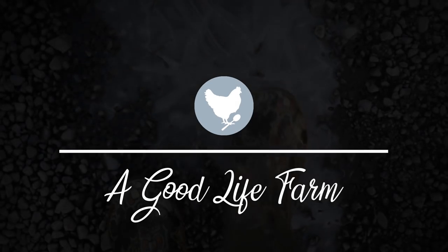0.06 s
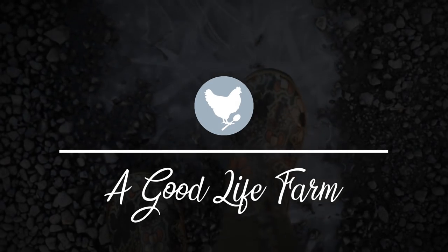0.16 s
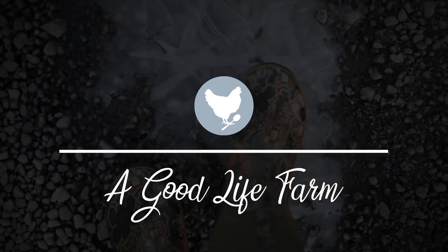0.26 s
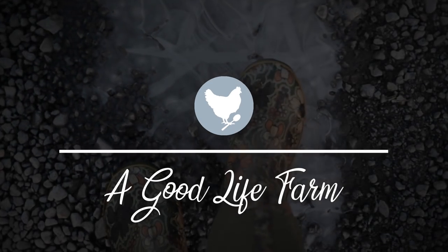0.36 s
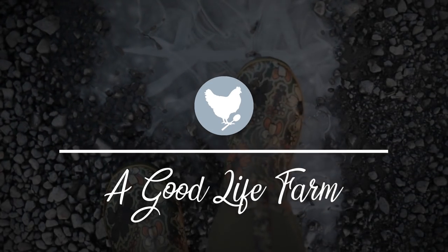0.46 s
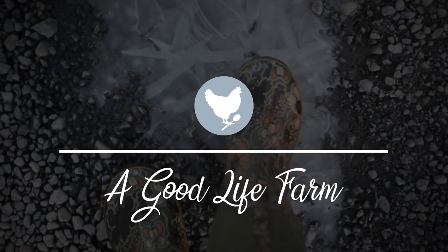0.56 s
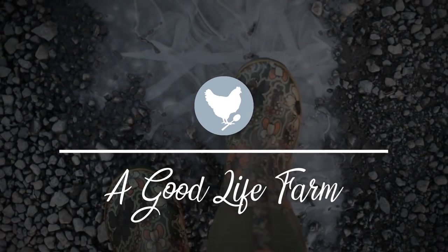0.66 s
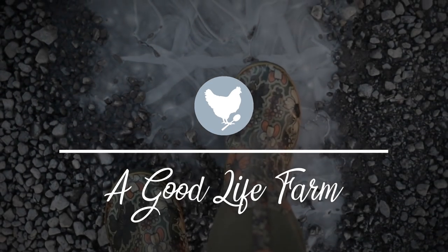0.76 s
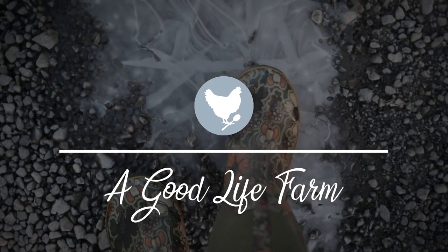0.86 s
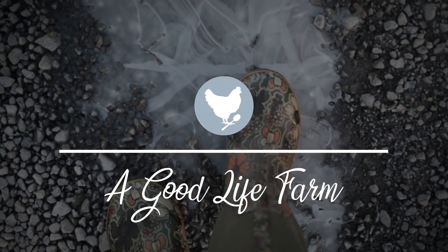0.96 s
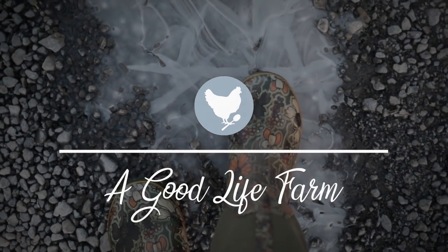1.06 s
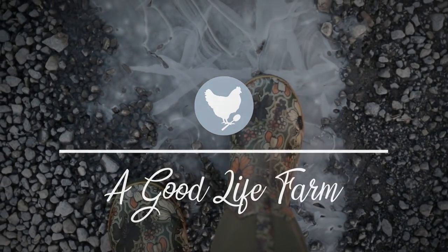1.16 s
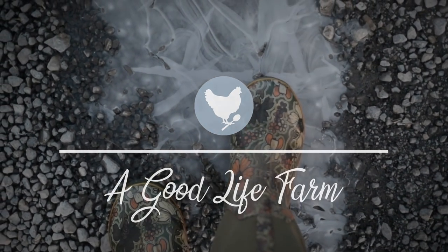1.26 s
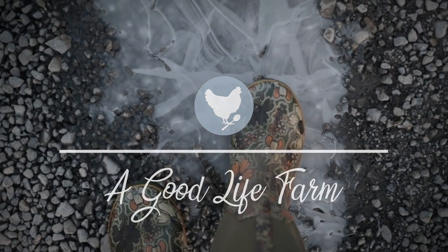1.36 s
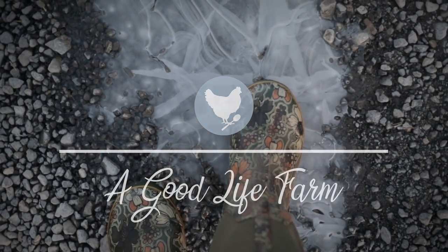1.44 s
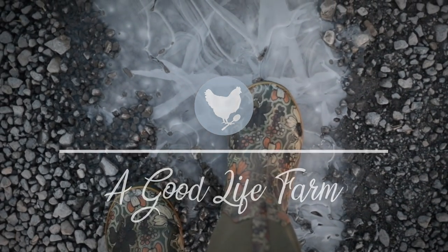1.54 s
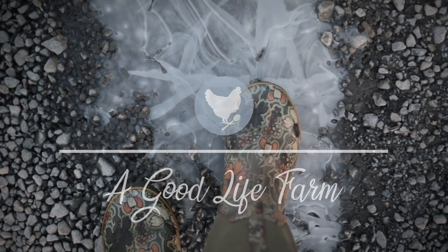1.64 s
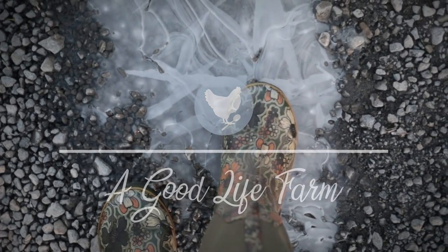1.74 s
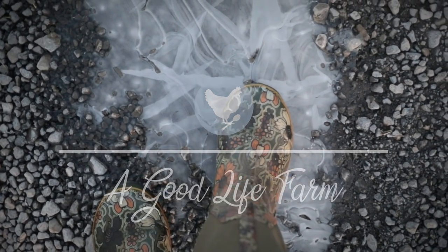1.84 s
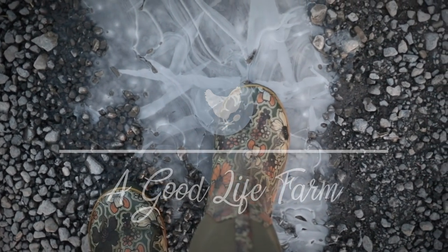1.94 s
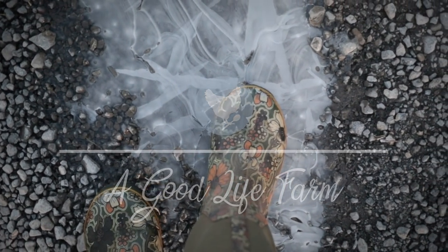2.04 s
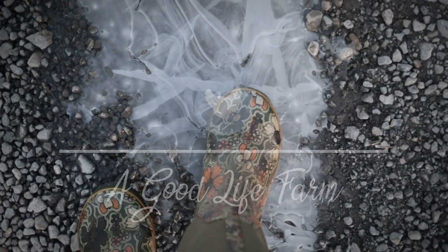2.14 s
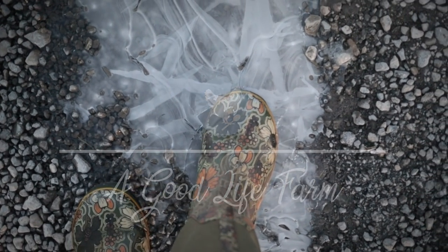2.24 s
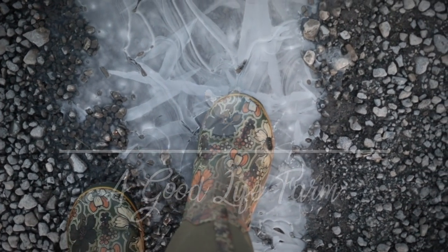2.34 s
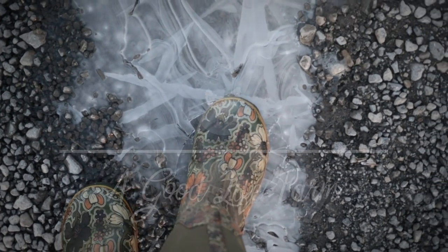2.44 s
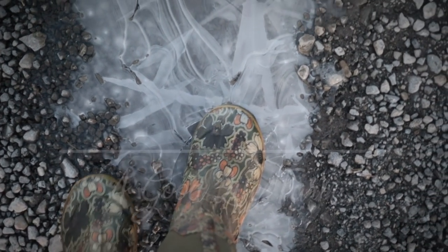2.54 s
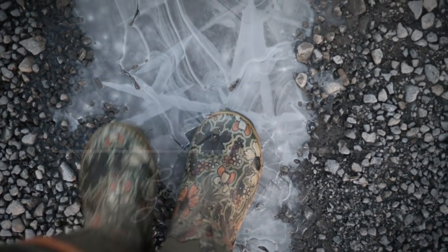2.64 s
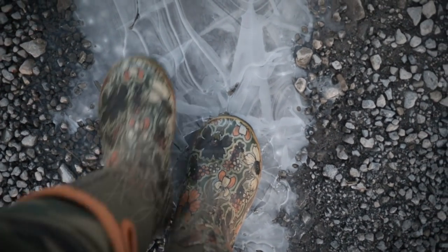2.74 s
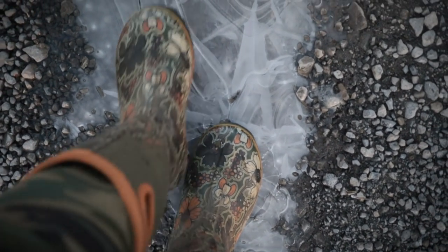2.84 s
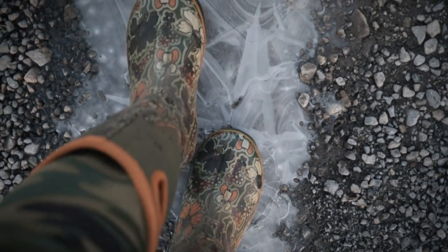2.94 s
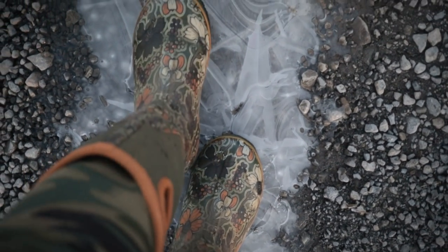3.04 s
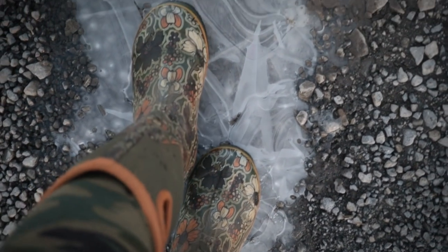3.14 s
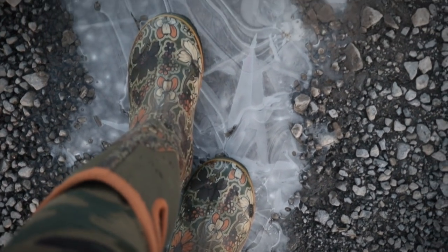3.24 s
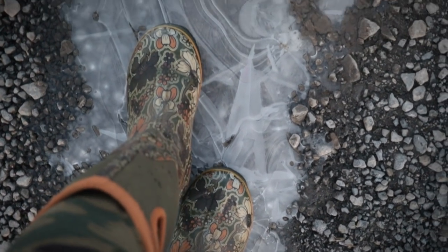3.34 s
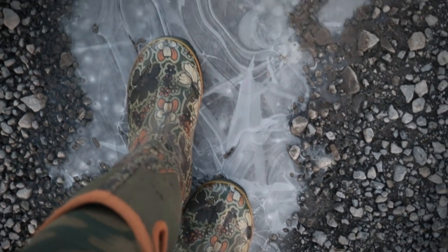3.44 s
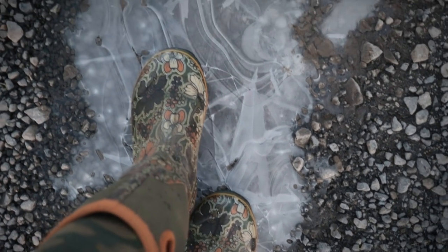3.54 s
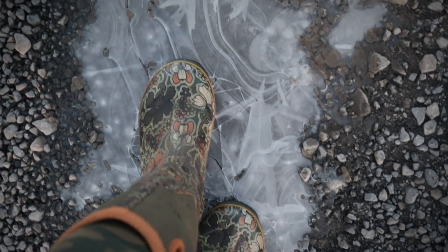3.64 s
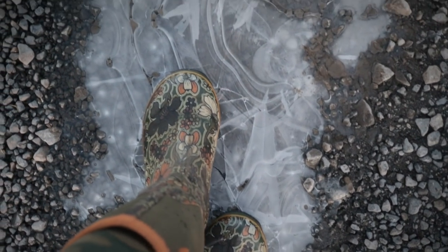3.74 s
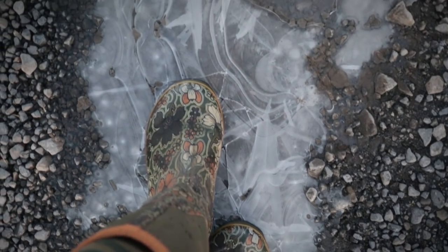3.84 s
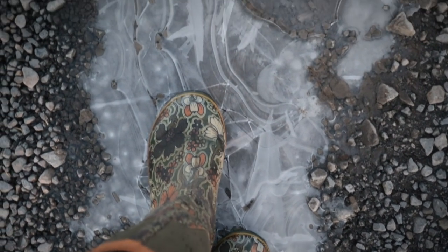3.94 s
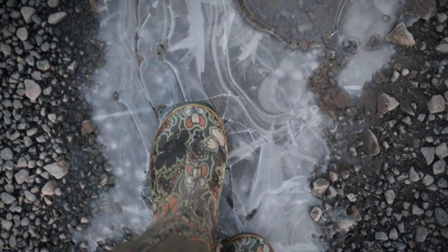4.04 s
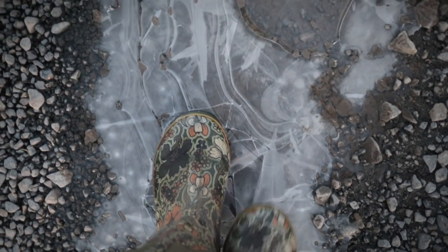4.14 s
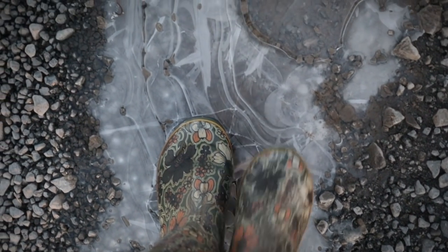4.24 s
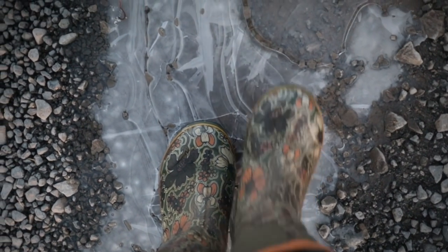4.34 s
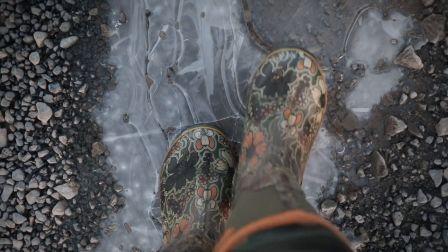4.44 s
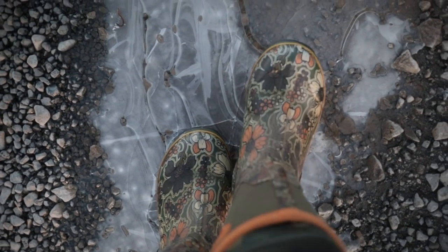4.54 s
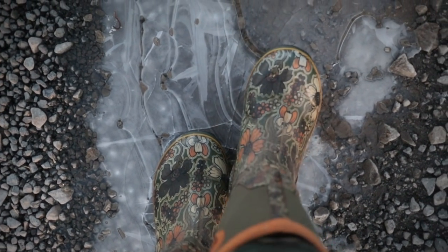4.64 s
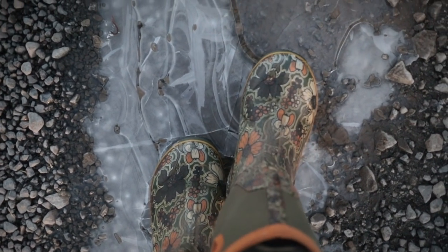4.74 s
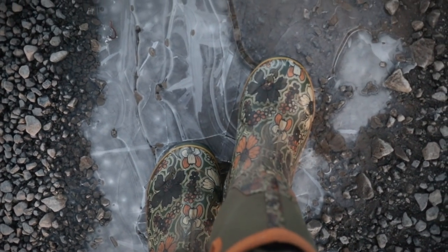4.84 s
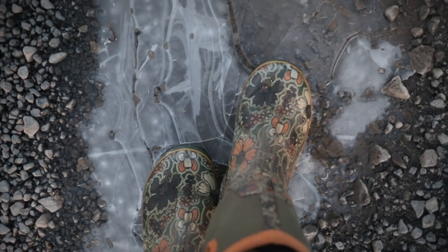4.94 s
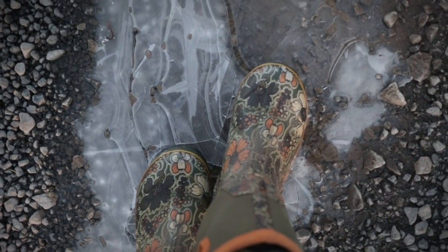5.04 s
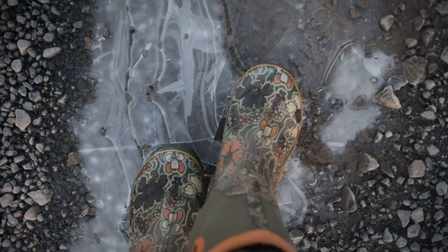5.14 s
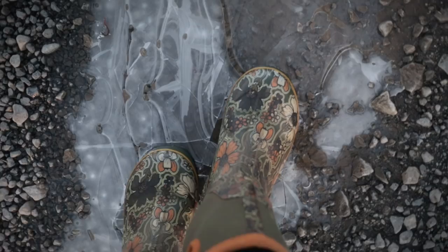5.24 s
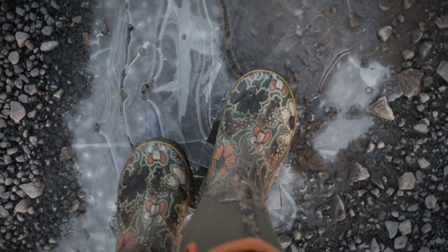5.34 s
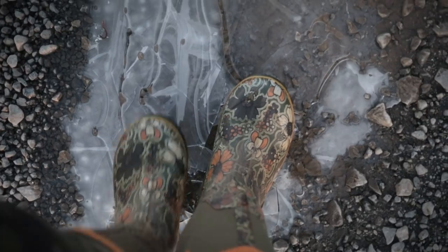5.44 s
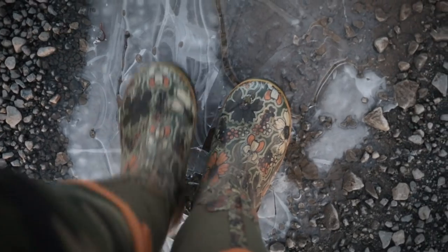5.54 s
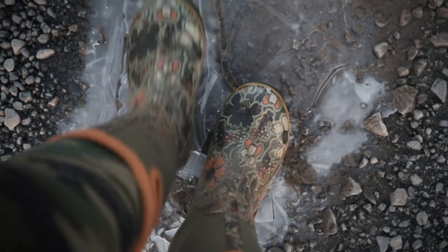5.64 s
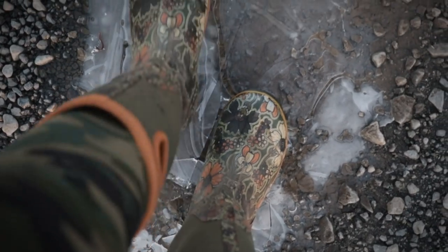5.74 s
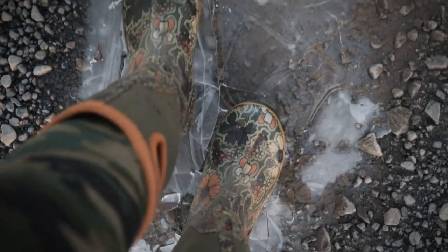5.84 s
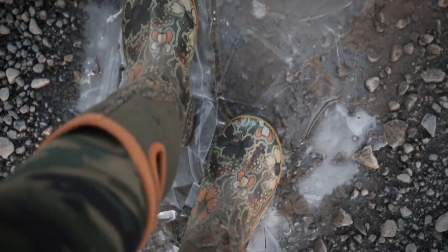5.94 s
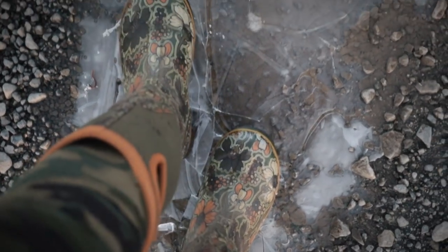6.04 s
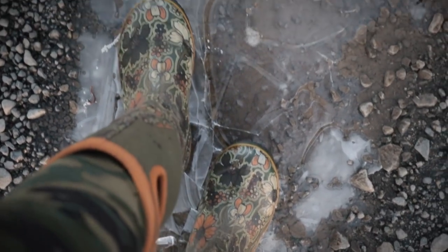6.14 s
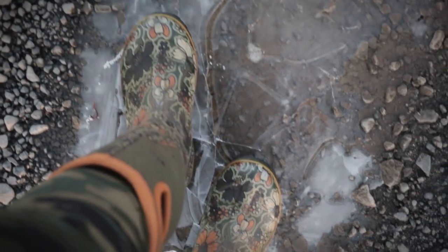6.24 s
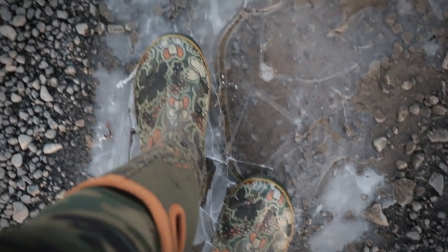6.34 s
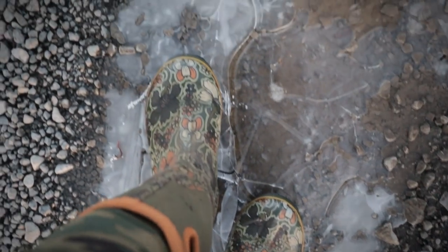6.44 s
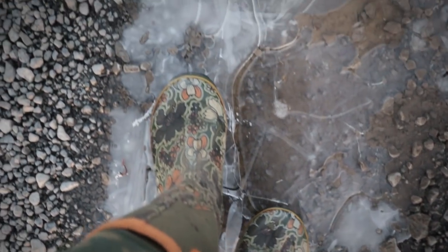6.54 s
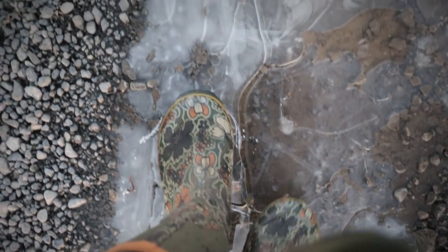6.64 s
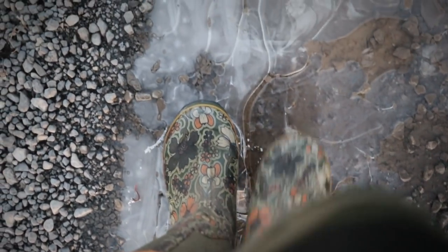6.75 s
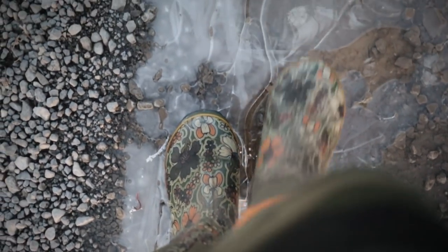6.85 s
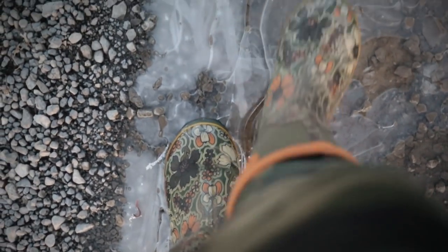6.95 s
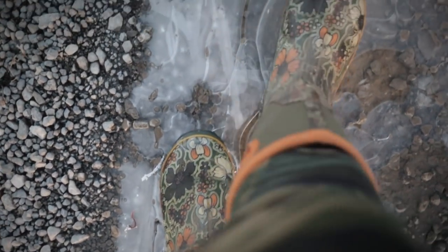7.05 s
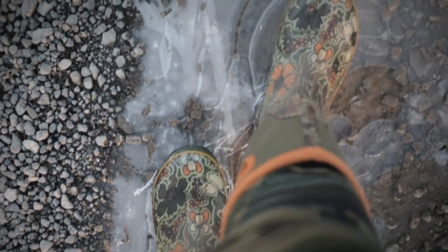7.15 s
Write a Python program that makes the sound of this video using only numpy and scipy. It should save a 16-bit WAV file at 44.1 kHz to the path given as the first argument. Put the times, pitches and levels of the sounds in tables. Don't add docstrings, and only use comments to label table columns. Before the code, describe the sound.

Very close outdoor sound of boots pressing a brittle ice skin over stones: irregular bursts of crackle, bright splinters, mid-pitched grinding plates and brief hollow thumps. The first step sounds higher and shallower, later ones fuller, the third densest and loudest. Between steps only sparse ticks and soft air remain. A distant bird chirps faintly near the start, wet rubber squeaks before the last steps, and peaks overload the small microphone.

```python
import sys
import numpy as np
from scipy import signal
from scipy.fft import rfft, irfft, next_fast_len
from scipy.io import wavfile
from scipy.ndimage import uniform_filter1d

SR = 44100
rng = np.random.default_rng(int(sys.argv[2]) if len(sys.argv) > 2 else 0)


def unload_audio(sound):
    columns = np.transpose(np.atleast_2d(sound))
    steps = np.round(np.clip(columns, -1, 1) * 32767)
    wavfile.write(sys.argv[1], SR, steps.astype(np.int16))


def how_loud(loudness_db):
    steps = np.asarray(loudness_db, float) / 20
    return 10 ** steps


N = 317079
LENGTH = 1536
EDGE_S = 1.5


def unit(x):
    return x / np.sqrt(np.mean(x ** 2) + 1e-20)


def equal_energy(rows):
    return 14 * rows / np.linalg.norm(rows, axis=1, keepdims=True)


def curves(rows):
    s, *columns = np.transpose(rows)
    return [np.interp(np.arange(N) / SR, s, column) for column in columns]


def coloured(x, points):
    f, level = np.transpose(points)
    hz = np.fft.rfftfreq(x.shape[-1], 1 / SR)
    gain = how_loud(np.interp(np.log(hz + 1), np.log(f + 1), level))
    return irfft(rfft(x) * gain, x.shape[-1])


def highpass(x, hz):
    return signal.sosfilt(signal.butter(2, hz, "high", fs=SR, output="sos"), x)


def scatter(rows, s):
    at = np.round(s * SR).astype(int)[:, None] + np.arange(rows.shape[1])
    return np.bincount(at.ravel(), rows.ravel(), N + LENGTH)[:N]


# (frequency [Hz], level [dB per Hz])
AIR = [(25, 19.5), (167, 1.5), (431, -15.5), (1280, -8), (10000, -64), (15000, -36), (16300, -24)]


def open_air():
    return how_loud(-44.5) * unit(coloured(rng.standard_normal(N), AIR))


# (time [s], level [dB])
DRONE_LEVEL = [
    (0, -35),
    (1.6, -42),
    (7.19, -55.5),
]
# (frequency [Hz], level [dB per Hz])
DRONE_COLOUR = [(20, 4.5), (160, -5), (260, -19.5), (1000, -49)]


def distant_drone():
    level_db, = curves(DRONE_LEVEL)
    return how_loud(level_db) * unit(coloured(rng.standard_normal(N), DRONE_COLOUR))


def whistle(rows):
    hz, db = curves(rows)
    t = np.arange(N) / SR
    flicker_db = 2.2 * unit(uniform_filter1d(rng.standard_normal(N), size=400))
    sounding = (t > rows[0][0]) * (t < rows[-1][0])
    return how_loud(db + flicker_db) * np.sin(2 * np.pi * np.cumsum(hz) / SR) * sounding


# (time [s], pitch [Hz], level [dB])
BIRD = [
    (.148, 3080, -73.5),
    (.165, 3120, -57),
    (.25, 3330, -65),
    (.3, 3420, -61),
]


def far_bird():
    return whistle(BIRD)


# (time [s], pitch [Hz], level [dB])
SQUEAK = [
    (5.45, 880, -63),
    (5.5, 868, -56),
    (5.61, 865, -45),
    (5.68, 850, -59),
]


def boot_squeak():
    return whistle(SQUEAK)


# (time [s], peak level [dB], pitch [Hz])
BUMPS = [
    (.257, -32.5, 550),
    (0.259, -29, 106),
    (.925, -30, 83),
    (5.756, -31.5, 100),
    (5.914, -27, 80),
    (6.336, -31.5, 130),
    (5.758, -6.5, 814),
    (7.1123, -26.5, 330),
]


def bumps():
    s, db, hz = np.transpose(BUMPS)[:, :, None]
    cycles = hz * np.arange(LENGTH) / SR
    return scatter(-how_loud(db + 24.5) * np.sin(2 * np.pi * cycles) * cycles * np.exp(-2.5 * cycles), s[:, 0])


def scrape(depth_db):
    z = signal.stft(rng.standard_normal(N), nperseg=512)[2]
    field = uniform_filter1d(rng.standard_normal(z.shape), size=6, axis=0)
    field = uniform_filter1d(field, size=16, axis=1)
    return unit(signal.istft(z * how_loud(depth_db * unit(field)), nperseg=512)[1][:N])


# (time [s], length [s], level [dB], band spacing [Hz])
SLIPS = [
    (1.076, 0.44, -43, 2600),
    (2.52, 0.1, -43.5, 3300),
]
# (frequency [Hz], level [dB])
SLICK = [(500, 2), (1400, -12), (6000, -3), (16000, -10)]


def slides():
    hiss = unit(coloured(scrape(depth_db=3), SLICK))
    t = np.arange(N) / SR
    out = np.zeros(N)
    for s, length, db, spacing_hz in SLIPS:
        swell = np.sqrt(np.abs(np.sin(np.pi * np.clip((t - s) / length, 0, 1))))
        echo = np.roll(hiss, round(SR / spacing_hz))
        out += how_loud(db) * swell * (hiss - 0.69 * echo)
    return out


# (time [s], length [s], level [dB], plate pitch [Hz])
GRINDS = [(0.756, 0.041, -25, 1100), (0.815, 0.15, -44, 1730), (0.959, 0.07, -26.5, 2050),
          (1.088, 0.039, -34, 1600), (2.552, 0.046, -31, 1230), (2.752, 0.029, -28, 1140),
          (3.43, 0.052, -24, 890), (3.551, .1, -23.5, 697), (3.773, .04, -22.5, 900),
          (4.012, 0.073, -33, 990), (4.425, .17, -44, 554), (5.078, .06, -43, 420),
          (5.242, .055, -37.5, 1190), (4.66, 0.029, -26.5, 1090), (4.844, .07, -24.5, 1120),
          (4.952, .025, -22.5, 1226), (4.981, 0.087, -27, 1140), (5.882, 0.053, -21, 1340),
          (6.14, 0.17, -34.5, 1150), (6.616, .11, -37.5, 900)]


def grinds():
    s, length, db, hz = np.transpose(GRINDS)[:, :, None]
    size = 4 * LENGTH
    t, f = np.arange(size) / SR, np.fft.rfftfreq(size, 1 / SR)
    uneven = uniform_filter1d(rng.standard_normal((len(s), size)), size=60, axis=1)
    slips = rng.standard_normal(uneven.shape) * how_loud(5.5 * unit(uneven))

    def mode(centre, sharpness=2.7):
        damping = 1j * f * centre / sharpness
        return damping / (centre * centre - f * f + damping)

    plate = mode(hz) - how_loud(-10) * mode(3.42 * hz)
    hum = irfft(rfft(slips) * plate, size)
    swell = np.sin(np.pi * np.clip(t / length, 0, 1) ** 0.87) ** 0.83
    return scatter(how_loud(db) * swell * hum / hum.std(axis=1, keepdims=True), s[:, 0])


def grains(count, low_hz, high_hz, cycles, spread_db):
    moment, pitch, size, phase = rng.random((4, count, 1))
    clump_s = np.sort(rng.random(count // 6)) * N / SR
    start_s = clump_s[(moment[:, 0] * (count // 6)).astype(int)] + .006 * rng.random(count)
    hz, t = low_hz * (high_hz / low_hz) ** pitch, np.arange(300) / SR
    rings = np.sqrt(hz) * np.sin(2 * np.pi * (hz * t + phase)) * np.exp(-t * hz / cycles)
    gain = how_loud(np.minimum(-spread_db * np.log(size), 8))
    return unit(scatter(rings * gain, np.minimum(start_s, N / SR)))


# (frequency [Hz], level [dB])
HOLLOW = [(60, -47), (140, -30), (270, 8), (450, 6.5), (800, -1), (1300, -14), (2500, -68)]


def pocket(x, s):
    shallow = [(1.69 * hz, db) for hz, db in HOLLOW[:3]] + HOLLOW[4:]
    return np.where(s < EDGE_S, unit(coloured(x, shallow)), unit(coloured(x, HOLLOW)))


# (frequency [Hz], level [dB])
SPLINTER = [(3000, -10.5), (6000, 1), (11000, -4), (16000, -7.5)]


def splinters(x):
    return coloured(x, SPLINTER)


# (time [s], sheet level [dB], hollow level [dB], shard pitch [Hz])
BREAKS_1 = [(0.3393, -11.5, -47, 4140), (0.3744, -9, -31, 980), (.491, -6.5, -14.5, 3970),
            (0.516, -14, -32, 920), (.553, -16.5, -37, 1190), (0.5899, -11, -12, 2500),
            (0.6416, -18.5, -19.5, 1910), (0.6935, -13.5, -39, 1120), (0.7176, -17, -11, 1050),
            (0.7468, -10.5, -30, 1000), (0.7562, -14, -26, 1000), (0.846, -12, -41, 1250),
            (0.8579, -8.5, -45, 2420), (0.872, -10.5, -55, 2570), (0.8926, -11.5, -31, 990),
            (0.901, -14.5, -41, 1800), (0.913, -14.5, -45, 1620), (0.929, -11.5, -13, 2280),
            (0.998, -21.5, -24, 2120), (1.0242, -18.5, -25, 2190), (1.04, -16.5, -40, 2460),
            (1.063, -12, -54, 1600), (1.086, -20.5, -47, 1540), (1.2991, -17.5, -22.5, 2050)]
BREAKS_2 = [(1.584, -8, -13, 3080), (1.6154, -20.5, -29, 980), (1.6312, -11, -14, 3300),
            (1.6412, -9.5, -12, 3280), (1.698, -17.5, -8.5, 3360), (1.8417, -15.5, -13.5, 2800),
            (1.9562, -9.5, -13.5, 2090), (1.9898, -12.5, -9.5, 1470), (1.9947, -10, -4, 3940),
            (2.0028, -15, -34, 1430), (2.081, -14, -10.5, 1020), (2.097, -17, -28, 2370),
            (2.1286, -14.5, -23, 1140), (2.1668, -15, -48, 2670), (2.1975, -18, -17.5, 1520),
            (2.209, -18, -24, 3240), (2.2175, -18, -11.5, 1690), (2.292, -18.5, -16.5, 3600),
            (2.343, -12.5, -21, 3460), (2.355, -17, -21, 1080), (2.442, -10.5, -20, 740),
            (2.7332, -18.5, -21.5, 1100), (2.7476, -11.5, -18, 1290), (2.881, -19, -26, 1350)]
BREAKS_3 = [(3.1352, -2.5, -17, 1350), (3.151, -10.5, -8.5, 2480), (3.184, -13.5, -27, 885),
            (3.1909, -10, -28.5, 980), (3.202, -15, -14, 970), (3.2483, -18, -21, 1620),
            (3.276, -18.5, -20, 1700), (3.3372, -17, -24, 1110), (3.3606, -12, -19, 1160),
            (3.373, -12, -14, 1140), (3.3925, -13.5, -16, 2850), (3.4037, -13, -22, 1950),
            (3.4259, -10, -11, 1520), (3.4363, -14.5, -24, 1970), (3.4413, -9, -11, 1150),
            (3.4692, -19, -15.5, 1870), (3.5103, -13, -18, 1470), (3.5381, -9, -11.5, 1120),
            (3.5799, -13, -20.5, 1060), (3.591, -13, -14.5, 1070), (3.6091, -15, -14.5, 900),
            (3.619, -12, -16, 1810), (3.724, -18, -19.5, 3450), (3.758, -15.5, -23, 3840),
            (3.808, -26.5, -7.5, 910), (3.851, -13, -13.5, 990), (4.0769, -16.5, -43, 1220)]
BREAKS_4 = [(4.3814, -16.5, -34.5, 2330), (4.655, -7, -13, 950), (4.6944, -9, -25, 1060),
            (4.8013, -14, -27, 1500), (4.85, -14, -15, 890), (4.87, -20, -40, 1360),
            (4.8868, -19, -42, 1040), (4.9587, -14.5, -15, 1450), (4.9684, -10, -22.5, 1170),
            (5.041, -16, -34, 2200), (5.0622, -12.5, -18.5, 4420)]
BREAKS_5 = [(5.707, -11, -27, 885), (5.751, -8, -15.5, 2630), (5.8356, -17.5, -21.5, 3730),
            (5.8865, -11.5, -21, 790), (5.893, -9, -13.5, 1280), (5.909, -12, -10, 1160),
            (5.981, -19, -17.5, 3220), (6.0547, -13, -21.5, 3340), (6.0969, -12, -15, 3560),
            (6.1115, -12, -25.5, 2680), (6.2991, -16.5, -39, 1170), (6.336, -14.5, -25, 2660),
            (6.434, -13, -21, 1320), (6.453, -12, -14, 3240), (6.4844, -17, -28.5, 3410),
            (7.1496, -14.5, -11.5, 1850), (7.161, -29, -8, 1930), (7.1704, -5.5, -12, 846),
            (7.1801, -30, -15.5, 920)]


def large():
    return np.transpose(BREAKS_1 + BREAKS_2 + BREAKS_3 + BREAKS_4 + BREAKS_5)


def aftermath(s, db, fade_s):
    kicks = np.bincount(np.round(s * SR).astype(int), how_loud(db) ** 2, N)
    return signal.lfilter([1], [1, -np.exp(-1 / (fade_s * SR))], kicks)


# (frequency [Hz], level [dB per Hz])
GRIT = [(450, -13), (1150, 3), (2000, 2.5), (2800, 5), (3800, -3), (5200, -2.5), (9000, -74)]
# (time [s], level [dB])
LOAD_1 = [(.33, -66.5), (.5, -43), (.77, -33), (1.0, -42), (1.15, -37.5), (1.48, -48)]
LOAD_2 = [(1.63, -42), (1.98, -38), (2.04, -48.5), (2.11, -35.5), (2.37, -31), (2.385, -40), (2.57, -43),
          (2.67, -49), (2.75, -35.5)]
LOAD_3 = [(2.92, -46.5), (2.96, -60), (3.11, -57.5), (3.16, -33), (3.61, -34.5), (3.699, -40), (3.8, -34),
          (4.071, -36.5), (4.27, -62.5)]
LOAD_4 = [(4.396, -40), (4.6, -46.5), (4.68, -35.5), (4.87, -30.5), (5.2, -42), (5.42, -42.5), (5.49, -53)]
LOAD_5 = [(5.68, -44), (5.87, -44), (6.12, -35.5), (6.45, -44.5), (6.58, -45), (6.66, -40), (7.03, -58.5),
          (7.146, -46), (7.156, -26)]


def crunch():
    load_db, = curves(LOAD_1 + LOAD_2 + LOAD_3 + LOAD_4 + LOAD_5)
    s, sheet_db, hollow_db, _ = large()
    t = np.arange(N) / SR
    full_db = -35
    over_db = load_db - full_db

    lead_db = sheet_db - 17.5 + 0.32 * np.minimum(over_db[(s * SR).astype(int)], 0)
    lead = aftermath(t[-1] - s, lead_db, fade_s=0.0021)[::-1]
    debris = aftermath(s, sheet_db - 10.5, fade_s=0.0018)
    grit_db = 10 * np.log10(how_loud(load_db) ** 2 + lead + debris)
    powder_db = full_db - 8 + 0.89 * (grit_db - full_db)

    bend_db = full_db - 6.5 + 1.4 * over_db - 9.5 * (t < EDGE_S)
    sway = aftermath(s, hollow_db - 19.5, fade_s=0.014)
    flex_gain = np.sqrt(how_loud(bend_db) ** 2 + sway)

    load = np.clip((grit_db + 65) / 35, .55, 1)
    bits = load * grains(count=14000, low_hz=405, high_hz=15100, cycles=1.12, spread_db=5.5)
    rub = scrape(depth_db=2.2)
    grit = how_loud(grit_db - 1.5) * unit(coloured(bits + .6 * rub, GRIT))
    powder = how_loud(powder_db) * unit(splinters(bits + 0.57 * rub))
    flex = flex_gain * pocket(bits + 0.27 * rub, t)

    snaps = grains(count=1500, low_hz=1500, high_hz=14700, cycles=0.49, spread_db=-4.5)
    stray = how_loud(full_db - 12.5 + 0.83 * over_db) * snaps
    return grit + powder + flex + stray


def burst(noise, t60, rise, tail_db, tail_t60):
    t = np.arange(LENGTH) / SR
    fall = how_loud(-60 * t / t60) + how_loud(tail_db - 60 * t / tail_t60)
    return equal_energy(noise * (1 - np.exp(-t / rise)) * fall)


# (frequency [Hz], level [dB])
SHEET = [(260, -0.5), (800, 3), (2000, 0.5), (4200, -2.5), (5800, -6.5), (16000, -17)]


def shard(hz, spread_db):
    f, t = np.fft.rfftfreq(LENGTH, 1 / SR), np.arange(LENGTH) / SR
    wide = how_loud(spread_db) / np.sqrt(1 + (0.21 * hz / (f + 1)) ** 4)
    peak = 1 / (1 + ((f - hz) / (0.5 * hz)) ** 2)
    noise = coloured(rng.standard_normal((len(hz), LENGTH)), SHEET)
    noise = irfft(rfft(noise) * (wide + peak), LENGTH)
    body = burst(noise, t60=0.0062, rise=0.00012, tail_db=-4.0, tail_t60=0.028)
    ring = equal_energy(np.sin(2 * np.pi * hz * t) * how_loud(-60 * t * hz / 25))
    return how_loud(-0.5) * body + how_loud(-6.0) * ring


def spit_db(hz, s):
    wet_db = -0.65 * (s - N / SR / 2)
    pitch_db = 3 * np.log2(hz / 1000)
    return -16 + wet_db + pitch_db + 5 * rng.standard_normal(hz.shape)


# (time [s], level [dB], shard pitch [Hz])
CHIPS_1 = [(0.1278, -48, 1490), (0.3966, -29, 4090), (0.4597, -30, 3750), (0.517, -9.5, 1260),
           (0.5437, -27, 1980), (0.685, -17, 1940), (0.6245, -22.5, 900), (0.8203, -20.5, 3400),
           (0.837, -18, 4090), (0.883, -21.5, 4090), (0.9896, -14.5, 2480), (1.006, -10, 2260),
           (1.0171, -10, 2280), (1.0344, -16.5, 2110), (1.092, -15.5, 1550), (1.1035, -26, 1850),
           (1.2269, -32, 4780)]
CHIPS_2 = [(1.552, -36, 410), (1.604, -24.5, 3880), (1.6165, -13, 1030), (1.667, -21, 1060),
           (1.6856, -18, 4340), (1.7011, -7.5, 402), (1.8752, -22, 3730), (1.9193, -27, 3930),
           (1.9571, -8, 605), (2.1159, -22, 2280), (2.142, -15, 1910), (2.3635, -27.5, 4040),
           (2.5477, -25, 1010), (2.562, -28, 1320), (2.5287, -25, 1900), (2.6765, -33, 600),
           (2.6293, -34, 1340), (2.6403, -25, 1910), (2.8111, -17, 1080)]
CHIPS_3 = [(3.089, -39.5, 2240), (3.1829, -7, 740), (3.229, -14, 940), (3.258, -26, 1450),
           (3.2642, -15.5, 1530), (3.3028, -18.5, 2370), (3.3543, -21, 3880), (3.4508, -14, 2520),
           (3.48, -16, 1970), (3.552, -12.5, 2390), (3.5704, -15, 690), (3.6317, -18, 500),
           (3.777, -15.5, 745), (3.8007, -18, 1200), (3.8098, -2, 610), (3.8854, -37, 720),
           (4.0074, -21, 1160), (4.0612, -26, 1230), (4.0668, -28, 1250), (4.1987, -20.5, 5200),
           (4.0735, -13.5, 1210)]
CHIPS_4 = [(4.4005, -23.5, 2430), (4.4318, -28, 616), (4.6462, -17, 530), (4.6876, -15.5, 2580),
           (4.733, -14.5, 1280), (4.7678, -13.5, 1050), (4.8412, -15, 467), (4.865, -24, 3530),
           (4.8792, -10, 1830), (4.9079, -25, 950), (5.0083, -24, 3880), (5.0273, -28.5, 4350),
           (5.081, -25, 3240), (5.166, -29, 1430), (5.2189, -30, 3120), (5.2572, -28, 1150),
           (5.266, -27.5, 1720), (5.3326, -25, 1120), (5.386, -24, 2500)]
CHIPS_5 = [(5.694, -22, 484), (5.7199, -19.5, 4000), (5.88, -19, 6050), (5.974, -17.5, 4000),
           (6.0878, -20, 3940), (6.1769, -30, 2650), (6.3248, -20, 2560), (6.396, -20.5, 547),
           (6.4143, -25, 4330), (6.476, -19.5, 1010), (6.526, -25.5, 600), (6.609, -29.0, 705),
           (6.6196, -22, 1140), (6.625, -28, 1130), (6.6855, -20, 2280), (6.7772, -25, 3680),
           (6.7, -28, 514), (6.742, -29.5, 590), (6.8697, -36.5, 575), (7.0751, -32, 565),
           (7.1607, -9, 590)]


def chips():
    s, db, hz = np.transpose(CHIPS_1 + CHIPS_2 + CHIPS_3 + CHIPS_4 + CHIPS_5)[:, :, None]
    noise = splinters(rng.standard_normal((len(s), LENGTH)))
    spray = burst(noise, t60=0.0036, rise=0.00009, tail_db=-6, tail_t60=0.036)
    snap = shard(hz, spread_db=-14) + how_loud(spit_db(hz, s) - 2.0) * spray
    return scatter(how_loud(db - 6.5) * snap, s[:, 0])


# (time [s], level [dB], pitch [Hz])
KNOCKS = [(0.3401, -10, 2250), (0.3752, -17, 840), (0.491, -4, 1000), (0.5054, -21, 8700),
          (0.592, -20.5, 9050), (0.6418, -14.5, 900), (0.716, -8.5, 2170), (0.8576, -9, 1770),
          (0.952, -16, 2130), (1.064, -5.5, 1640), (1.842, -18, 7250), (1.9893, -9, 3420),
          (2.098, -17, 1020), (2.1968, -11, 1570), (2.7498, -11, 1240), (3.135, -11.5, 3160),
          (3.1487, -15, 8430), (3.5373, -9, 2650), (3.6696, -23.5, 5900), (4.0767, -22.5, 10300),
          (4.886, -4.5, 1060), (6.0967, -12, 2390), (6.3002, -21, 8700), (6.3371, -13, 1250)]


def knocks():
    s, db, hz = np.transpose(KNOCKS)[:, :, None]
    t = np.arange(LENGTH) / SR
    t60 = np.minimum(35 * np.sqrt(hz / 2000) / hz, 0.015)
    rings = np.sin(2 * np.pi * hz * t) * how_loud(-60 * t / t60)
    return scatter(how_loud(db - 5) * equal_energy(rings), s[:, 0])


# (time [s], level [dB], shard pitch [Hz])
TICKS_1 = [(0.3123, -29.5, 1260), (0.328, -29, 2260), (0.358, -30.5, 3000), (0.403, -17.5, 5040),
           (0.4272, -31.5, 2290), (0.438, -19.5, 2020), (0.45, -21.5, 1150), (0.4734, -21.5, 920),
           (0.505, -22, 2020), (0.577, -29, 3930), (0.631, -23, 1980), (0.6556, -21.5, 950),
           (0.6677, -15.5, 1030), (0.789, -22, 2110), (0.809, -19, 1150), (0.832, -16, 1640),
           (0.977, -20, 1800), (1.1195, -20.5, 1490), (1.2333, -20.5, 3060), (1.258, -29.5, 900),
           (1.274, -20.5, 740), (1.333, -27, 3560), (1.3898, -25.5, 620)]
TICKS_2 = [(1.573, -16.5, 710), (1.7225, -20, 4740), (1.7585, -22, 4060), (1.773, -32, 3450),
           (1.887, -27, 4600), (1.9033, -17, 415), (1.9327, -17.5, 470), (1.9765, -33, 400),
           (2.058, -21.5, 1650), (2.2603, -19, 3370), (2.2868, -13.5, 1790), (2.371, -20.5, 1600),
           (2.5113, -19, 1206), (2.646, -31.5, 1940), (2.7007, -24.5, 1680), (2.7222, -20, 1630),
           (2.8012, -18.5, 1350), (2.8483, -26, 1000), (2.868, -32.5, 4300), (2.9059, -32.5, 1500),
           (2.918, -21, 2330), (2.933, -29.5, 1500)]
TICKS_3 = [(3.1231, -24, 388), (3.3248, -22.5, 1040), (3.456, -16.5, 754), (3.562, -23, 484),
           (3.654, -15.5, 427), (3.6697, -22.5, 4000), (3.7007, -33, 3390), (3.837, -17.5, 467),
           (3.9843, -17, 1080), (4.001, -25.5, 890), (4.034, -19, 900), (4.052, -28, 925),
           (4.089, -28.5, 1150), (4.1987, -19.5, 1065)]
TICKS_4 = [(4.3446, -36, 1310), (4.3757, -26, 497), (4.4158, -21.5, 540), (4.5003, -29, 1120),
           (4.5346, -32, 1960), (4.627, -37, 8200), (4.67, -17, 1200), (4.724, -15, 1420),
           (4.7597, -26, 935), (4.832, -15.5, 905), (4.9182, -18, 1520), (5.0124, -32.5, 1210),
           (5.0566, -26, 450), (5.153, -22.5, 1036), (5.316, -32.5, 3830), (5.403, -38, 2710),
           (5.515, -40, 2470)]
TICKS_5 = [(5.6012, -34.5, 1900), (5.6293, -27.5, 620), (5.673, -35.5, 3140), (5.7228, -24, 854),
           (5.791, -25.5, 600), (6.009, -23, 2420), (6.0315, -22, 543), (6.042, -26, 3540),
           (6.1341, -20, 710), (6.215, -27, 1120), (6.4052, -25.5, 530), (6.509, -20.5, 726),
           (6.5567, -35, 3300), (6.635, -29.5, 620), (6.6601, -21.5, 566), (6.685, -23, 1330),
           (6.755, -32, 1390), (6.7767, -22.5, 1160), (6.829, -32.5, 2250), (7.0503, -39.5, 2590),
           (7.091, -42, 410), (7.111, -35.5, 417)]


def ticks():
    s, db, hz = np.transpose(TICKS_1 + TICKS_2 + TICKS_3 + TICKS_4 + TICKS_5)[:, :, None]
    noise = splinters(rng.standard_normal((len(s), LENGTH)))
    spray = burst(noise, t60=0.0082, rise=0.0002, tail_db=-4.0, tail_t60=0.023)
    crack = shard(hz, spread_db=-8) + how_loud(spit_db(hz, s) + 1.0) * spray
    return scatter(how_loud(db) * crack, s[:, 0])


def breaks():
    s, sheet_db, hollow_db, hz = large()[:, :, None]
    low, high = rng.standard_normal((2, len(s), LENGTH))
    hollow = burst(pocket(low, s), t60=0.027, rise=0.00014, tail_db=-23, tail_t60=0.017)
    spray = burst(splinters(high), t60=0.021, rise=0.00017, tail_db=-22.0, tail_t60=0.0075)
    sheet = shard(hz, spread_db=-8) + how_loud(spit_db(hz, s)) * spray
    return scatter(how_loud(sheet_db) * sheet + how_loud(hollow_db) * hollow, s[:, 0])


def scene():
    background = open_air() + distant_drone() + far_bird()
    boots = boot_squeak() + bumps() + slides()
    loose = grinds() + crunch() + highpass(chips(), 350)
    ice = knocks() + highpass(ticks() + breaks(), 190)
    return (background + boots + loose + ice)[None]


def roll_off(x):
    return signal.sosfilt(signal.butter(12, 15900, fs=SR, output="sos"), x)


# (frequency [Hz], level [dB])
CAPSULE = [(3300, 0), (4100, 4), (4900, -1), (6000, 0)]


def record(dry):
    spare = next_fast_len(N, True) - N + N % 2
    heard = coloured(np.pad(dry, ((0, 0), (0, spare))), CAPSULE)[:, :N]
    mix = np.clip(highpass(heard, 170), -1, 1)
    return roll_off(mix)


dry = scene()
out = record(dry)
unload_audio(out)
```